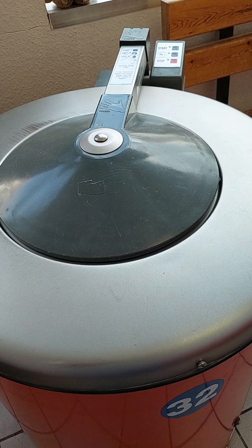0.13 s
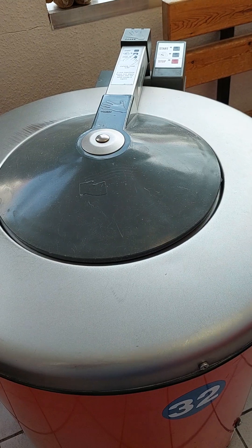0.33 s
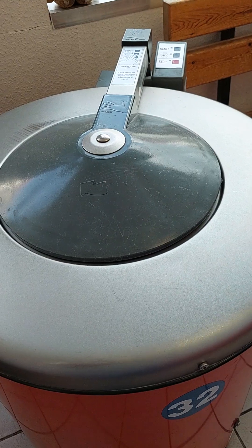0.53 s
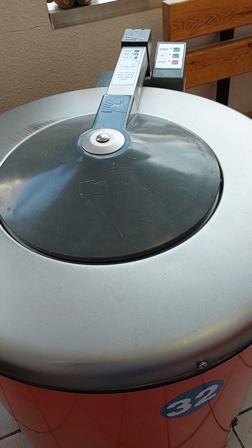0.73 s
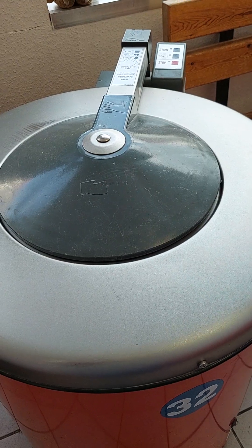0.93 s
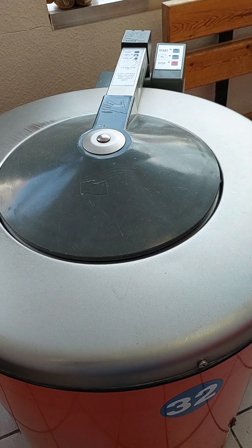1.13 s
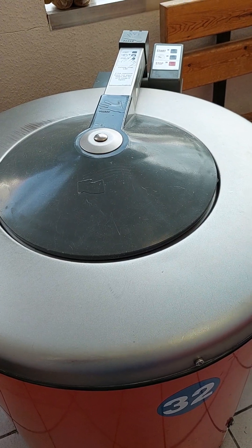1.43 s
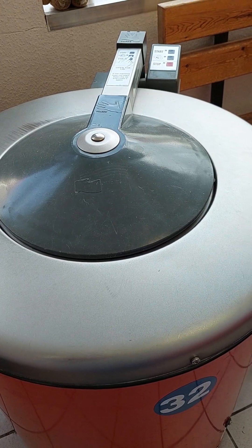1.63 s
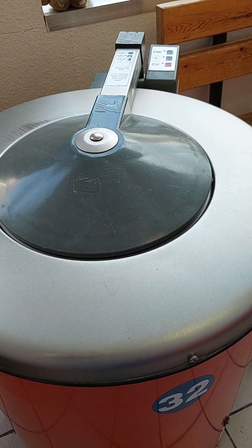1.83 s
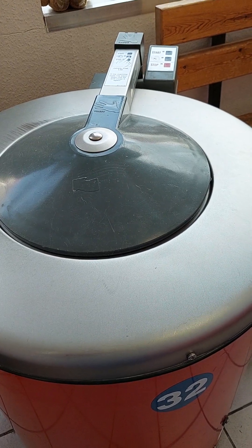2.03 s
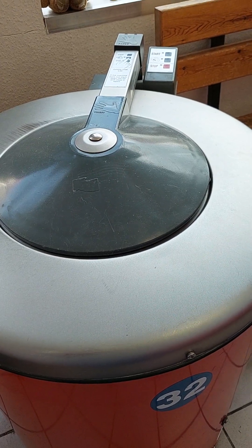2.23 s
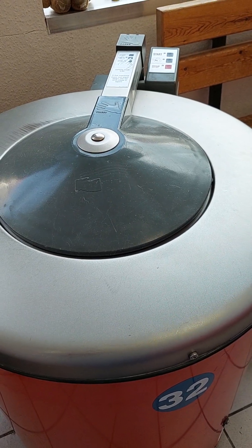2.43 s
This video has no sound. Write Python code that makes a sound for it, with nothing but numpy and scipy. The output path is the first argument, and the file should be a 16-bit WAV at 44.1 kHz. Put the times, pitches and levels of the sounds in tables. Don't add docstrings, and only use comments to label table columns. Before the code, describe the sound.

A spin dryer runs at full speed, a low buzzing motor hum under steady rushing air

```python
import sys
import numpy as np
from scipy import signal
from scipy.fft import rfft, irfft, next_fast_len
from scipy.io import wavfile
from scipy.ndimage import uniform_filter1d

SR = 44100
rng = np.random.default_rng(int(sys.argv[2]) if len(sys.argv) > 2 else 0)


def volts_from_db(level):
    exponent = np.asarray(level, float) / 20
    return 10 ** exponent


def log_audio(samples):
    frames = np.atleast_2d(samples).T
    limited = np.clip(frames, -1, 1)
    pcm = np.round(limited * 32767).astype(np.int16)
    wavfile.write(sys.argv[1], SR, pcm)


N = 113337
T = np.arange(N) / SR

TURNS_HZ = 23.782
CAGE_HZ = 9.43
CAGE_SHARE, CAGE_KEEP = 0.5, 0.55
HUM_LEAD_S, RUSH_LEAD_S = 0.0002, -0.00017


def evened(x):
    return x / np.sqrt(np.mean(x ** 2) + 1e-20)


def read(points, hz):
    f, value = np.transpose(points)
    return np.interp(np.log(hz + 1), np.log(f + 1), value)


def drift(top_hz, count):
    f = np.geomspace(0.3, top_hz, num=12)[:, None]
    coarse_s = T[::64]
    start_turns = rng.random((count, 12, 1))
    slow = (np.sin(2 * np.pi * (f * coarse_s + start_turns)) / np.sqrt(f)).sum(1)
    return np.array([np.interp(T, coarse_s, evened(row)) for row in slow])


def hum():
    # multiple, level_db, beat_hz, loudest_s, twin_share
    orders = [(2, -52.4, 0.11, 5.0, 0.0), (3, -52.3, 0.19, -0.58, 0.12), (4, -50.0, 0.22, 1.36, 0.31),
              (5, -47.6, 0.15, -3.0, 0.08), (6, -49.2, 0.18, 0.62, 0.0), (7, -54.2, 0.16, 4.98, 0.17),
              (8, -44.3, 0.41, 1.7, 0.79), (9, -34.9, -0.55, -0.18, 0.51), (10, -44.4, -0.24, -0.83, -0.01),
              (11, -38.1, -0.56, -2.21, -0.02), (12, -57.7, 0.64, -0.0, 0.33),
              (13, -40.0, -0.2, -3.1, -0.01), (14, -36.4, 0.58, 0.47, 0.79), (15, -28.4, 0.16, -2.46, 0.65),
              (16, -42.7, 0.66, 3.28, 0.76), (17, -47.1, 0.6, 1.49, 0.51), (18, -47.9, -1.0, 2.77, 0.62),
              (19, -42.5, 0.75, -0.24, 0.27), (20, -55.9, 0.42, 0.59, 0.56), (21, -63.7, 0.31, -0.79, 0.01),
              (22, -64.0, 0.66, 2.29, 0.23), (24, -54.9, -0.12, -3.0, 0.61), (25, -43.8, 1.41, 0.05, 0.05),
              (26, -54.8, 1.12, 1.32, 0.15)]
    # multiple, sway_hz, loudest_s, depth
    sways = [(8, 0.54, 0.78, 0.69), (8, 0.77, 1.67, 0.47), (9, 0.49, 2.16, 0.48), (9, 0.6, 3.0, 0.69),
             (9, 0.66, 2.38, 0.55), (10, 0.42, 1.14, 0.58), (10, 1.53, 2.67, 0.13), (11, 0.38, 2.91, 0.88),
             (11, 0.43, 1.92, 0.41), (11, 0.48, -0.93, 0.74), (13, 0.45, 1.06, 0.91),
             (13, 0.54, 0.11, 0.43), (14, 0.65, 1.15, 0.82), (14, 0.86, 1.64, 0.65), (14, 1.15, 2.08, 0.76),
             (15, 0.53, 1.04, 0.75), (15, 0.64, 0.19, 0.86), (15, 0.66, 2.19, 0.28),
             (16, 0.68, -0.12, 0.69), (16, 0.74, 0.88, 0.81), (16, 1.77, 2.07, 0.37),
             (17, 0.47, 0.68, 0.63), (17, 0.95, 2.95, 0.56), (18, 0.36, 1.03, 0.37), (18, 1.06, 0.33, 0.54),
             (18, 1.41, 0.77, 0.4), (19, 0.56, 0.72, 0.41), (19, 1.12, 0.2, 0.48), (25, 0.2, 3.0, 0.6),
             (25, 0.3, 0.54, 0.87)]
    # time_s, level_db
    lean = [(0.0, -5.4), (0.15, -3.7), (0.27, -5.1), (0.4, -1.1), (0.6, -0.6), (0.9, -0.0), (1.2, -0.2),
            (1.4, -0.4), (1.7, 0.2), (2.0, 0.7), (2.25, -0.7), (2.57, -1.3)]
    # freq_hz, left_minus_right_db
    hum_pan = [(60, -4), (170, 3), (215, -4.5), (265, -7), (310, -4.5), (360, -1.5), (450, -2), (600, -4.5)]
    knock_s, spread_turns, scatter_turns = 0.02481, -0.012, 0.01
    wobble_db, wobble_turns = 0.5, 0.012
    side_turns = 0.03
    sides = np.array([1, -1])

    wobble = drift(top_hz=5.97, count=3 * len(orders))
    scatter = rng.standard_normal(len(orders))
    out = np.zeros((2, N))
    for i, (multiple, level_db, beat_hz, loudest_s, twin_share) in enumerate(orders):
        phase_wobble, level_wobble, side_wobble = wobble[3 * i:3 * i + 3]
        hz = multiple * TURNS_HZ

        sway = np.ones(N)
        for panel_multiple, sway_hz, sway_loudest_s, depth in sways:
            if panel_multiple == multiple:
                sway *= 1 + depth * np.cos(2 * np.pi * sway_hz * (T - sway_loudest_s))

        beat_turns = beat_hz * (T - loudest_s)
        pair = (1 + twin_share * np.exp(2j * np.pi * beat_turns)) * np.exp(-1j * np.pi * beat_turns)

        turns = hz * (T - knock_s) - spread_turns * multiple ** 2
        turns = turns + scatter_turns * scatter[i] + wobble_turns * phase_wobble
        tone = 1j * np.sqrt(2) * pair * sway * np.exp(2j * np.pi * turns)
        tone = tone * volts_from_db(level_db + wobble_db * level_wobble)

        ports = volts_from_db(read(hum_pan, hz) / 2 * sides) * np.exp(1j * np.pi * hz * HUM_LEAD_S * sides)
        ports = ports / abs(ports.mean())
        wander = np.exp(2j * np.pi * side_turns * np.outer(sides, side_wobble))
        out += (ports[:, None] * tone * wander).real
    return out * volts_from_db(np.interp(T, *np.transpose(lean)))


def noise(shape, patchy_db, lead_s):
    # freq_hz, correlation
    likeness = [(60, 1), (450, 0.88), (600, 0.27), (1500, 0.28), (3000, 0.27), (4600, 0.33), (6000, 0.05),
                (15000, 0.15)]
    # freq_hz, left_minus_right_db
    noise_pan = [(700, -3), (1300, -4.5), (2300, 0), (3200, -2.5), (5000, -9.5), (5700, -2), (7500, 17.5),
                 (8500, 9), (9500, 4), (12000, -6), (14500, 4)]
    frames, hz = N // 2048 + 5, np.fft.rfftfreq(8192, 1 / SR)
    a, b, c, d, patches = rng.standard_normal((frames, len(hz), 5)).T
    patches = uniform_filter1d(patches, size=60, axis=0)
    patches = evened(uniform_filter1d(patches, size=2, axis=1))

    same = np.clip(read(likeness, hz), -1, 1)[:, None]
    left = a + 1j * b
    right = same * left + np.sqrt(1 - same ** 2) * (c + 1j * d)
    right = right * np.exp(-2j * np.pi * hz * lead_s)[:, None]
    balance = volts_from_db(read(noise_pan, hz) / 2)[:, None]
    z = np.array([left * balance, right / balance])
    z = z * shape(hz)[:, None] * volts_from_db(patchy_db * patches)
    return evened(signal.istft(z, nperseg=8192, noverlap=6144)[1][:, :N])


def peaks(rows, hz):
    power = 0
    for f, width_hz, peak_db in rows:
        power = power + volts_from_db(peak_db) ** 2 / (1 + (2 * (hz - f) / width_hz) ** 2) ** 2
    return np.sqrt(power)


def recurring(x, round_hz, share, keep):
    size = next_fast_len(N)
    one_round = np.exp(-2j * np.pi * np.fft.rfftfreq(size, 1 / SR) / round_hz)
    comb_power = 1 - share + share * (1 - keep ** 2) / abs(1 - keep * one_round) ** 2
    return irfft(rfft(x, size) * np.sqrt(comb_power), size)[:, :N]


def shell():
    # freq_hz, width_hz, peak_db
    ring_rows = [(587.3, 16, -10.5), (684, 26, -23), (853, 36, -8.5), (1020, 93, -17), (1084, 82, -11),
                 (1440, 23, -1.5), (1504, 52, -6.5), (1720, 15, -19), (1718, 52, -13.5), (1960, 92, -16.5),
                 (2212, 11, -15), (2494, 45, -21), (2760, 24, -32), (2984, 43, -14)]
    # freq_hz, rms_db
    whine_rows = [(845.2, -55.5), (995.9, -53.5), (1109, -54.5), (1195, -62), (1432, -51), (1637, -47.5),
                  (1733, -56.5), (1906, -60), (2169, -54), (2406, -62), (2837, -63), (4371, -67),
                  (4710, -64.5)]
    # time_s, level_db
    rub = [(0, -.5), (.34, -1), (.84, 1.5), (1.28, -1.5), (1.4, 0.5), (1.55, 0.5), (1.8, 1.5), (2.5, 0.5)]
    rings_db, whine_width_hz, whine_db = -41, 7.4, 1.5

    rings = volts_from_db(rings_db) * noise(lambda hz: peaks(ring_rows, hz), patchy_db=0.5, lead_s=RUSH_LEAD_S)
    rings = recurring(rings, CAGE_HZ, CAGE_SHARE, CAGE_KEEP)

    thin_rows = [(f, whine_width_hz, db) for f, db in whine_rows]
    total_db = 10 * np.log10(sum(volts_from_db(db) ** 2 for f, db in whine_rows))
    whines = noise(lambda hz: peaks(thin_rows, hz), patchy_db=0.2, lead_s=RUSH_LEAD_S)
    whines = volts_from_db(total_db + whine_db) * whines

    flutter_db = 0.96 * drift(top_hz=22.2, count=1)
    return (rings + whines) * volts_from_db(flutter_db + np.interp(T, *np.transpose(rub)))


def air():
    # freq_hz, density_db
    rumble_rows = [(20, -36), (36, -19), (55, -10), (150, -11), (340, -10), (457, -9), (530, -24),
                   (620, -10), (900, -24), (1300, -61), (2200, -120)]
    # freq_hz, density_db
    rush_rows = [(470, -57), (750, -17), (1450, -8), (2070, -12), (3150, -20), (4050, -18), (4500, -22.5),
                 (4900, -18.5), (5600, -27), (7280, -48), (12300, -120)]
    # freq_hz, density_db
    hiss_rows = [(3180, -34), (5400, -5.5), (6000, -4.5), (7000, -9.5), (7580, -12.5), (9370, -13.5),
                 (12200, -12), (14300, -18), (15700, -25)]
    rumble_db, rush_db, hiss_db = -37.5, -38, -56.5

    def layer(rows, level_db, patchy_db, lead_s):
        return volts_from_db(level_db) * noise(lambda hz: volts_from_db(read(rows, hz)), patchy_db, lead_s)

    rumble = layer(rumble_rows, rumble_db, 1.5, HUM_LEAD_S)
    rush = layer(rush_rows, rush_db, 0.8, RUSH_LEAD_S)
    hiss = layer(hiss_rows, hiss_db, 0.6, RUSH_LEAD_S)
    rush = recurring(rush, CAGE_HZ, CAGE_SHARE, CAGE_KEEP)
    hiss = recurring(hiss, TURNS_HZ, share=0.63, keep=0.58)
    return (rumble + rush + hiss) * volts_from_db(0.16 * drift(top_hz=9.1, count=1))


def hollowed(x):
    # freq_hz, width_hz, depth_db (negative cuts, positive lifts)
    dips = [(178, 22, -8), (287, 21, -8), (356, 18, -7.5), (362.4, 30, 6), (427, 43, -5.5), (632, 13, -8.5),
            (736, 32, -2.5), (926, 41, -3.5), (1242, 43, -8.5), (1617, 87, -4), (1934, 23, -2),
            (2102, 66, -7), (2347, 70, -6), (2750, 44, -0.5), (3155, 46, -10), (6960, 300, -7.5)]
    size = next_fast_len(N)
    hz = np.fft.rfftfreq(size, 1 / SR)
    gain_db = sum(depth_db * np.exp(-(2 * (hz - f) / width_hz) ** 2) for f, width_hz, depth_db in dips)
    return irfft(rfft(x, size) * volts_from_db(gain_db), size)[:, :N]


def thuds():
    # centre_s, level_db, pitch_hz
    thud_rows = [
        (0.032, -39, 212),
        (0.038, -34.5, 143),
        (0.2, -37.5, 59.7),
        (0.361, -38, 60.5),
        (0.77, -40, 125),
        (0.788, -35, 60.4),
        (2.03, -35, 128),
        (2.311, -37, 122),
    ]
    swell_s = 0.018
    out = np.zeros(N)
    for centre_s, level_db, pitch_hz in thud_rows:
        swell = np.exp(-((T - centre_s) / swell_s) ** 2)
        out += volts_from_db(level_db) * swell * np.sin(2 * np.pi * pitch_hz * (T - centre_s))
    return out


def scene():
    mix = hum() + hollowed(shell() + air()) + thuds() * volts_from_db([[-1.2], [1.2]])
    start_s = 0.0015
    return mix * np.sin(np.pi / 2 * np.minimum(T / start_s, 1)) ** 2


def low_pass(x):
    return signal.sosfilt(signal.butter(12, 15730, fs=SR, output="sos"), x)


def record(dry):
    return low_pass(dry)


dry = scene()
out = record(dry)
log_audio(out)
```